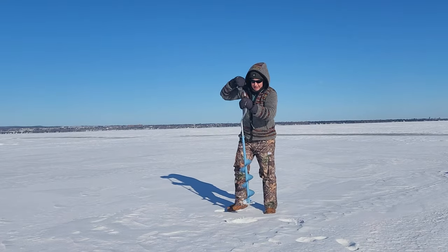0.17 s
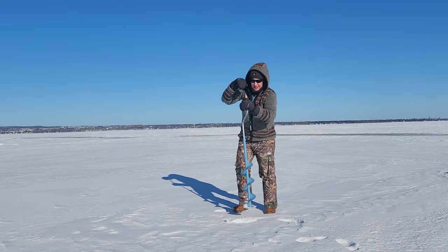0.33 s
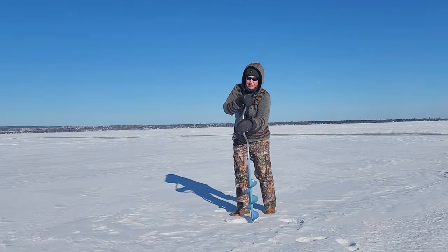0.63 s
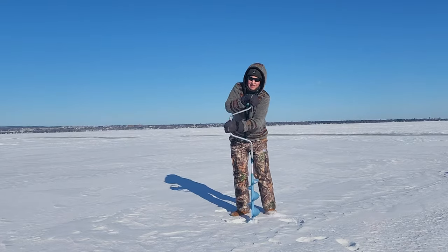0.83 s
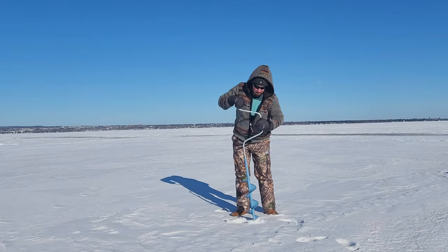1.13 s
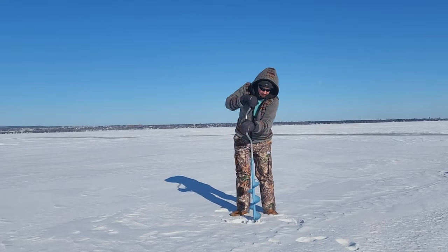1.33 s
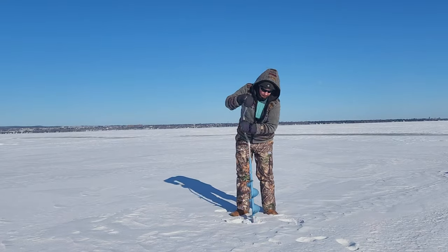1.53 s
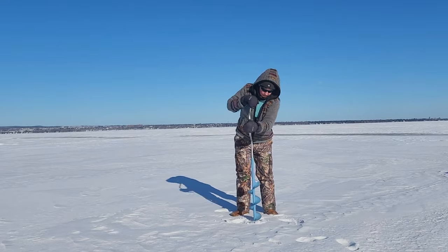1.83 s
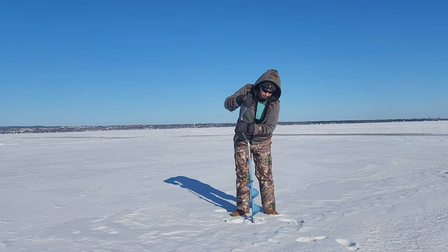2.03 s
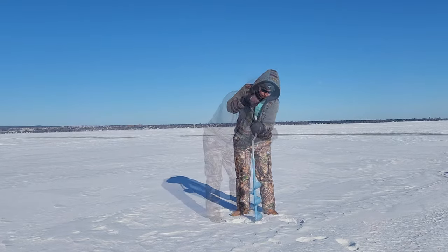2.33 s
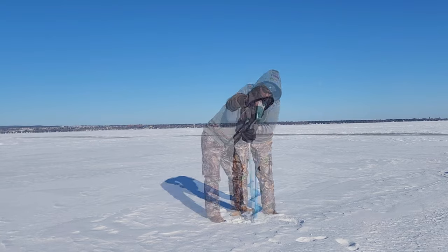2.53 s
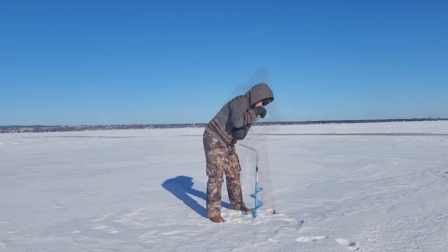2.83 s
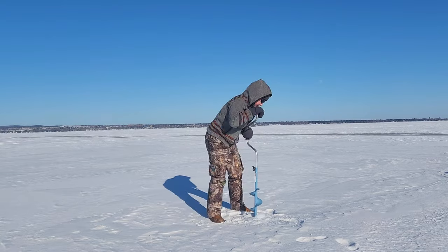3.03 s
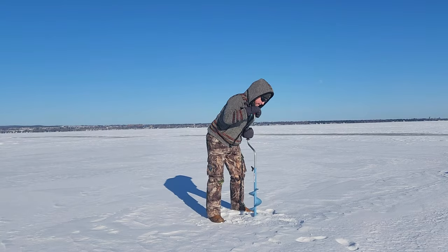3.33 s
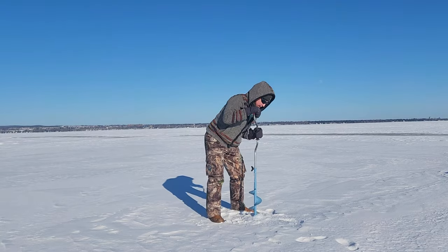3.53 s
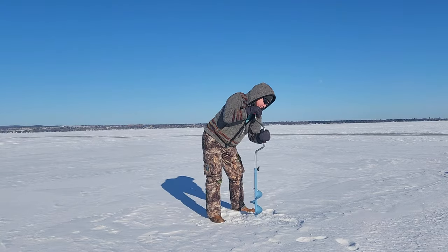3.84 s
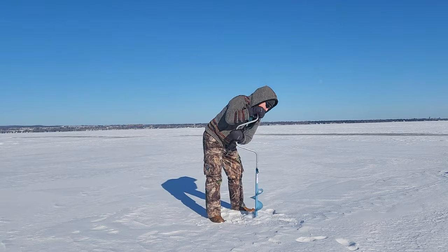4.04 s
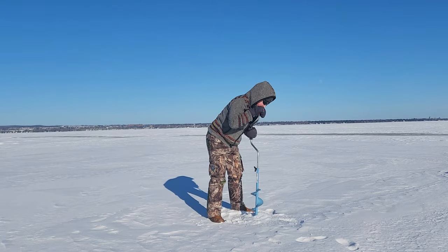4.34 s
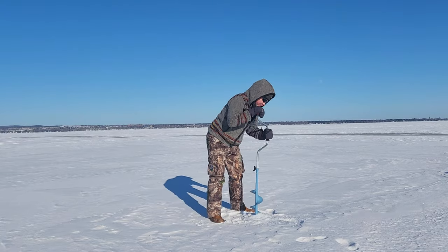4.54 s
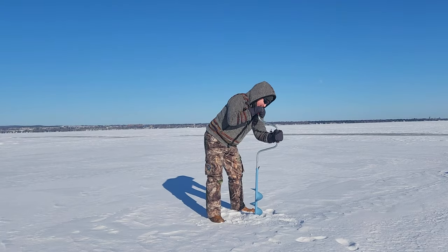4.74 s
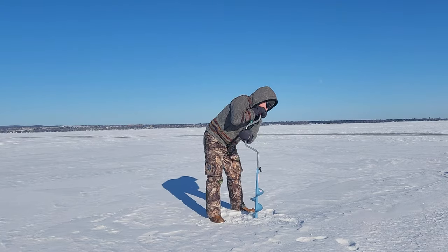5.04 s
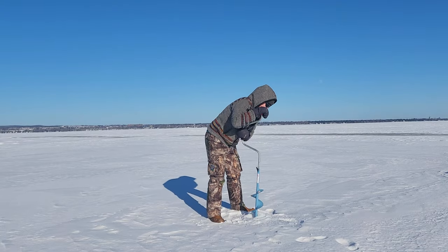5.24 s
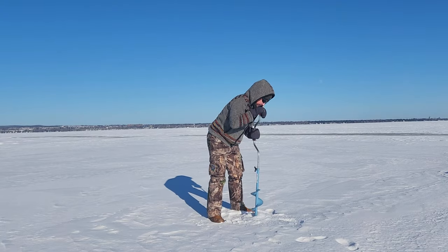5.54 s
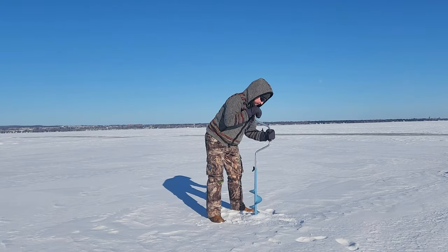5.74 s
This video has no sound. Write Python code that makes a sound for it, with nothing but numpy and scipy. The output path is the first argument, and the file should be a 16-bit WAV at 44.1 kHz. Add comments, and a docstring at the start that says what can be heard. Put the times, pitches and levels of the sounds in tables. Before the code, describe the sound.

A hand-cranked auger rasps and squeaks through packed snow, then grinds harder and hollower into ice, with wind rumbling on the microphone.

```python
"""Hand auger cutting snow, then ice

A hand-cranked auger shaves packed snow, then river ice, a few metres from a small camera.
Random noise stands for the tiny breaks; filters turn it into chips, blade grind, squeaks, steel and hole drum.
Bites are short noise bursts. Wind is lumpy filtered noise plus low swinging thumps on two microphone ports."""
import sys
import numpy as np
from scipy import signal
from scipy.fft import rfft, irfft, next_fast_len
from scipy.io import wavfile
from scipy.ndimage import uniform_filter1d, map_coordinates

SR = 44100
rng = np.random.default_rng(int(sys.argv[2]) if len(sys.argv) > 2 else 0)


def gain_from_db(level_db):
    """Convert decibel levels to linear amplitude factors (20 dB per decade)."""
    decades = np.asarray(level_db, float) / 20
    return 10 ** decades


def wav_record(signal):
    """Record a signal, one row per channel, as 16-bit PCM in the file named by sys.argv[1]."""
    frames = np.transpose(np.atleast_2d(signal))
    bounded = np.clip(frames, -1, 1)
    # unit amplitude maps onto the largest positive 16-bit level
    quanta = np.round(bounded * 32767).astype(np.int16)
    wavfile.write(sys.argv[1], SR, quanta)


N = 259308  # length in samples

# When snow gives way to ice: change_starts_s, change_ends_s
ICE_REACHED_S = 2.36, 2.42
# Balance of the parts at each moment: time_s, grind_over_shaving_db, drum_over_grind_db, low_blade_over_grind_db
# (cutting() lowers the grind a little in ice; the drum and blade functions add a fixed gain)
PART_LEVELS = [(0, -5, -8, 2), (.45, -6.5, -8, 0), (.84, -8.5, -8, -10), (1.08, -2, -8, -14),
               (1.4, -7.5, -8, -12), (1.55, -6.5, -8, 0), (2.06, -8.5, -8, 2.5), (2.45, -5, 0.5, -6),
               (2.66, -2, -3, -16), (2.78, -2.5, 5, -9), (2.9, -0.5, -6, -0.5), (3.55, -4.5, -1.5, 3.5),
               (3.8, -1.5, 2, -6.5), (4.1, -3.5, -5.5, -9), (4.27, 3, 1, 6), (4.46, -4.5, 2.5, 1),
               (4.72, -4, 0, 1), (4.9, -1.5, 0, -12), (5.22, -1.5, -7.5, -5), (5.5, -1.5, 7.5, 6.5),
               (5.65, -5, -5, 8), (5.88, 0.5, -3.5, -8)]


def cutting():
    """One stream of breaks excites the flying chips, the blades, the steel and the air in the hole."""
    grind_db, drum_db, low_blade_db = curves(PART_LEVELS)
    in_ice = np.interp(np.arange(N) / SR, ICE_REACHED_S, [0, 1])
    pressure = effort()
    plain_breaks = fractures(spread_db=2.5, chatter_db=1.1, snaps_db=0, in_ice=in_ice)
    even = pressure * plain_breaks
    breaks = pressure * patchy(plain_breaks, broad_db=1.2, narrow_db=3.5)
    body = grind(breaks, in_ice) + blade_modes(even, low_blade_db, in_ice)
    body = body + squeak(even, in_ice) + gain_from_db(drum_db) * hole_drum(even, in_ice)
    ring = gain_from_db(-46.0) * signal.fftconvolve(breaks, steel(scatter_db=1.0))[:N]
    return chips(breaks, in_ice) + ring + gain_from_db(grind_db - 1.1 * in_ice) * body


# Effort on the crank, heard as shaving level: time_s, level_db
EFFORT = [(0, -58), (.15, -70.5), (.36, -63), (.44, -51), (.52, -59.5), (.74, -54.5), (1.02, -48.5),
          (1.24, -54.5), (1.47, -45), (1.7, -51.5), (1.92, -47.5), (2.2, -51.5), (2.3, -58), (2.44, -46.5),
          (2.66, -44), (2.78, -50.5), (2.96, -43), (3.45, -45.5), (3.92, -43.5), (4.05, -53), (4.4, -57.5),
          (4.64, -48), (4.84, -45), (5.21, -43.5), (5.36, -55.5), (5.46, -61.5), (5.6, -48), (5.88, -44)]
# Blades run through harder or softer grain: middle_s, change_db, half_length_s
SURGES = [(0.207, 7, 0.045), (0.43, 12, 0.0099), (0.58, 11.5, 0.008), (0.653, -9, 0.025),
          (0.886, -6, 0.054), (2.552, -11.5, 0.02), (2.812, 9, .005), (3.166, 18.5, 0.03),
          (3.417, 14, 0.017), (3.73, 3.5, 0.017), (3.865, -5, 0.015), (4.189, 7, 0.025),
          (4.477, 5.5, 0.035), (4.782, -8, 0.035), (4.973, -11, 0.011)]
# The crank stalls: blades_let_go_s, blades_catch_again_s, depth_db
STALLS = [(0.203, 0.349, 22), (0.532, 0.623, 15), (2.463, 2.533, 22), (2.773, 2.88, 28.5),
          (3.037, 3.438, 42), (4.2, 4.295, 4.5), (5.463, 5.532, 29)]
LET_GO_S, CATCH_S = 0.058, .006  # how long the shaving takes to die, and to return


def effort():
    """Slow effort, plus surges, minus stalls that die away and end in a quick catch."""
    t = np.arange(N) / SR
    level_db, = curves(EFFORT)
    for middle, change_db, half in SURGES:
        level_db = level_db + change_db * np.exp(-((t - middle) / half) ** 2)
    for let_go, catch, depth_db in STALLS:
        stalled = np.minimum((t - let_go) / LET_GO_S, (catch - t) / CATCH_S)
        level_db = level_db - depth_db * np.clip(stalled, 0, 1)
    return gain_from_db(level_db)


def fractures(spread_db, chatter_db, snaps_db, in_ice):
    """Tiny breaks of uneven size, clumped by blade chatter; ice adds sudden snaps that die in a few ms."""
    size = gain_from_db(spread_db * rng.standard_normal(N))
    chatter = gain_from_db(chatter_db * (wobble(30) + wobble(70) + wobble(180)))
    snaps = (rng.random(N) < 260 / SR) * rng.random(N) * in_ice  # about 260 a second
    snap_decay = np.exp(-np.arange(SR // 50) / SR / .0012)
    crackle = 1 + gain_from_db(snaps_db) * signal.fftconvolve(snaps, snap_decay)[:N]
    return unit(rng.standard_normal(N) * size * chatter * crackle)


def patchy(x, broad_db, narrow_db):
    """The colour drifts as the cutting edge meets new grain: broad patches and narrow rasps."""
    z = signal.stft(x, nperseg=1024)[2]
    broad = broad_db * patches(z.shape, bins=20, hops=8)
    narrow = narrow_db * patches(z.shape, bins=2, hops=7)
    return unit(signal.istft(z * gain_from_db(broad + narrow), nperseg=1024)[1][:N])


# Colour of the shaved chips: pitch_hz, level_db (per Hz)
CHIP_COLOUR = [(2200, -87), (2900, -19), (3430, -2), (4150, 1), (5000, 0), (6400, -4), (7700, 4), (8400, 0),
               (9800, -3.5), (12200, -12), (14500, -9.5), (15900, -5), (16300, -91)]


def chips(breaks, in_ice):
    """Breaks throw off chips, heard as bright hiss; powdery snow hisses brighter."""
    hiss = coloured(breaks, CHIP_COLOUR)
    return hiss + 0.34 * (1 - in_ice) * filtered(hiss, lambda hz: hz > 8800)


# Colour of the blades in snow: pitch_hz, level_db (per Hz)
SNOW_GRIND = [(560, -69), (950, -9.5), (1250, -7), (1650, -4.5), (2040, -1), (2300, -1), (2800, -9),
              (3700, -55)]
# Colour of the blades in ice: pitch_hz, level_db (per Hz)
ICE_GRIND = [(500, -18.5), (740, -13), (1000, -10.5), (1300, -4.5), (1700, -5.5), (2080, -5.5),
             (2900, -12.5), (3770, -22), (6380, -120)]


def grind(breaks, in_ice):
    """The breaks shake the blades with one colour in snow and another in ice."""
    return (1 - in_ice) * coloured(breaks, SNOW_GRIND) + in_ice * coloured(breaks, ICE_GRIND)


# The blades' low resonance: pitch_hz, width_hz, level_db
LOW_BLADE = [(1390, 104, 0)]
# The blades' higher resonances, used in ice: pitch_hz, width_hz, level_db
HIGH_BLADES = [(1690, 38, -8), (2050, 93, -10)]


def blade_modes(even, low_blade_db, in_ice):
    """The breaks make the blades resonate; in ice higher resonances join, swelling at random."""
    low = gain_from_db(low_blade_db) * resonant(even, LOW_BLADE)
    high = in_ice * gain_from_db(3.8 * wobble(5)) * resonant(even, HIGH_BLADES)
    return gain_from_db(13.0) * (low + high)


# Packed snow squeaks under the blades: time_s, pitch_hz, level_db (against the grind)
SQUEAKS = [(.9, 1950, -1), (.97, 2030, 13), (1.14, 1960, 19), (1.26, 2080, 8), (1.32, 1790, 18),
           (1.39, 2050, 22), (1.51, 1780, 6), (1.59, 1970, 18.5), (1.8, 2100, 14), (1.92, 2030, 17),
           (1.99, 1670, 7), (2.15, 2200, 11)]


def squeak(even, in_ice):
    """Packed snow squeaks: the breaks pass through one narrow resonance whose pitch glides."""
    pitch_hz, level_db = curves(SQUEAKS)
    return (1 - in_ice) * gain_from_db(level_db) * gliding(even, pitch_hz, width_hz=98)


# Resonances of the air column in the hole: pitch_hz, width_hz, level_db
HOLE_AIR = [(650.4, 50.4, 4), (899, 46, -5)]
# How far the drum has moved to its lower pitch: time_s, share (0 to 1)
SAGGING = [(3.1, 0), (3.4, 1), (4.77, 1), (4.9, .4), (5.5, 1)]
HOLE_SAG = .935  # lower pitch as a ratio


def hole_drum(even, in_ice):
    """Breaks in ice drum the air in the hole; fading to a lower copy makes the pitch sag."""
    sag, = curves(SAGGING)
    usual = np.sqrt(1 - sag) * resonant(even, HOLE_AIR)
    lower = np.sqrt(sag) * resonant(even, HOLE_AIR, HOLE_SAG)
    return gain_from_db(15.5) * in_ice * (usual + lower)


# Ringing modes of the auger's flight: pitch_hz, level_db, time_to_fall_60_db_s
STEEL_MODES = [(1280, -8, .03), (1850, -12, .055), (4650, -5, .015), (7190, -9, .08), (7900, -6, .015),
               (9200, -12, .015)]


def steel(scatter_db, tilt_db=0):
    """The flight's modes after one tap; a dull tap tilts them down, in dB an octave."""
    t = np.arange(SR // 5) / SR
    lowest_hz = STEEL_MODES[0][0]
    ring = np.zeros(len(t))
    for hz, db, t60 in STEEL_MODES:
        start_db = db + tilt_db * np.log2(hz / lowest_hz) + scatter_db * rng.normal()
        ring += gain_from_db(start_db - 60 * t / t60) * np.sin(2 * np.pi * hz * t)
    return ring


# Blades biting: start_s, level_db (before a small fixed gain), grind_over_chips_db
BITES = [(0.419, -38.5, -12), (0.45, -31, -5), (2.4127, -32.5, -11.5), (2.5345, -39, 1), (2.627, -39, -1),
         (2.667, -38.5, 3.5), (2.782, -40.5, -3), (2.8814, -28, -2), (2.955, -32.5, 0.5), (2.9865, -33, -6),
         (3.021, -36, 4.5), (3.439, -27, -1), (3.4461, -19.5, -3.5), (3.5657, -27, -6), (3.608, -37.5, -6),
         (3.826, -38, -3.5), (3.906, -32, -1.5), (4.31, -47, 3.5), (4.342, -48.5, 6), (4.379, -51, 4.5),
         (4.828, -33.5, -11), (4.9778, -25.5, -3.5), (5.533, -45, 1)]
# The steel is tapped: start_s, level_db (before a fixed cut), tilt_db_per_octave
CLINKS = [(0.3498, -45, 2), (0.4328, -21.5, -8.5), (0.4495, -28, 2)]
# A bite this hard dies by 60 dB in this time; weaker ones crumble longer
SHARP_BITE_DB, SHARP_BITE_S, SOFTER_S_PER_DB = -19, .016, 0.0006


def bites():
    """Each bite is a short crunch of coarse breaks; a few clean taps ring the steel."""
    high, low, ring = np.zeros((3, N + SR))
    t = np.arange(SR // 5) / SR
    for s, db, grind_db in BITES:
        t60 = SHARP_BITE_S + SOFTER_S_PER_DB * max(SHARP_BITE_DB - db, 0)
        start = round(s * SR)
        crunch = rng.standard_normal(len(t)) * gain_from_db(rng.standard_normal(len(t)))  # uneven breaks
        crunch *= (1 - np.exp(-t / .0006)) * gain_from_db(db + .8 - 60 * t / t60)
        high[start:][:len(t)] += crunch
        low[start:][:len(t)] += gain_from_db(grind_db) * crunch
    for s, db, tilt_db in CLINKS:
        ring[round(s * SR):][:len(t)] += gain_from_db(db - 6.0) * steel(scatter_db=4.0, tilt_db=tilt_db)
    return coloured(high[:N], CHIP_COLOUR) + coloured(low[:N], ICE_GRIND) + ring[:N]


# How far the left port leads the right: pitch_hz, lead_radians
PORT_LEAD = [(300, -1), (2840, 0.39), (3270, -1.1), (4650, -1.05), (6550, -1.5), (9730, -1.37), (12500, -2),
             (16000, -3)]
# How much louder the left port is than the right: pitch_hz, left_over_right_db
PORT_BALANCE = [(500, -.5), (1400, -2.3), (2700, .5), (4200, -2), (6400, -4), (9000, 2), (15000, .5)]
# How far the phase wanders at each port: pitch_hz, wander_radians
PHASE_WANDER = [(800, .16), (2500, .3), (4000, .48), (14000, .65)]


def ports(x):
    """The camera body shades and delays the sound at each port; moving air makes each phase wander."""
    def half(hz):  # each port takes half the difference
        return gain_from_db(along(PORT_BALANCE, hz) / 2) * np.exp(.5j * along(PORT_LEAD, hz))

    pair = filtered(x, lambda hz: np.array([half(hz), 1 / half(hz)]))
    hz, _, z = signal.stft(pair, SR, nperseg=256)
    wander = along(PHASE_WANDER, hz)[:, None] * patches(z.shape, bins=3, hops=4)
    return signal.istft(z * np.exp(1j * wander), SR, nperseg=256)[1][:, :N]


# Wind across the ports, heard as flutter level: time_s, level_db
WIND = [(0, -40), (.4, -40.5), (1.4, -39), (1.65, -43), (2.1, -39), (2.75, -44), (3.15, -49.5), (3.7, -47),
        (4.2, -43), (4.55, -53), (5.0, -45), (5.38, -48), (5.53, -38.5), (5.88, -50)]
# Colour of the slow buffeting: pitch_hz, level_db (per Hz)
BUFFET = [(12, -38), (20, -22), (38, -4), (59, -3.5), (95, -2), (130, -19), (170, -69), (290, -120)]
# Colour of the quicker flutter: pitch_hz, level_db (per Hz)
FLUTTER = [(40, -92), (80, -21.5), (110, 8), (150, 8.5), (240, 0.5), (330, -50), (600, -120)]
# Colour of the rustle: pitch_hz, level_db (per Hz)
RUSTLE = [(180, -39), (270, 0.5), (450, -12.5), (650, -18), (900, -27.5), (2200, -34.5), (4000, -120)]
# Levels when the flutter is at CALM_DB, and dB gained for each dB of flutter above it
CALM_DB, BUFFET_DB, BUFFET_GROWS, RUSTLE_DB, RUSTLE_GROWS = -44.5, -39, 0.22, -59.5, 1.66


def wind():
    """Slow buffeting is largely shared; the quicker flutter and rustle belong more to each port."""
    flutter_db, = curves(WIND)
    buffet_db = BUFFET_DB + BUFFET_GROWS * (flutter_db - CALM_DB)
    rustle_db = RUSTLE_DB + RUSTLE_GROWS * (flutter_db - CALM_DB)
    buffet = gain_from_db(buffet_db) * gusts(BUFFET, alike=0.78, rate=12, lumps_db=3)
    flutter = gain_from_db(flutter_db) * gusts(FLUTTER, alike=0.39, rate=12, lumps_db=4)
    rustle = gain_from_db(rustle_db) * gusts(RUSTLE, alike=0.28, rate=12, lumps_db=5)
    return buffet + flutter + rustle + thumps()


def gusts(spectrum, alike, rate, lumps_db):
    """Lumpy pressure on both ports, a share of it (alike, 0 to 1) common to the two."""
    common, left, right = [gain_from_db(lumps_db * wobble(rate)) * rng.standard_normal(N) for _ in range(3)]
    pair = np.sqrt(alike) * common + np.sqrt(1 - alike) * np.array([left, right])
    return unit(coloured(pair, spectrum))


# Large eddies thumping the ports: middle_s, level_db (before a random lean to one port), pitch_hz
THUMPS = [(.09, -28, 50), (.227, -28.5, 63.4), (.32, -28, 79), (.445, -22, 144.5), (.652, -29, 60.5),
          (.788, -27, 151), (.871, -33, 140), (1.088, -34, 308), (1.387, -23, 57.5), (1.505, -30.5, 138),
          (1.621, -29, 141), (1.771, -28, 55), (1.841, -27.5, 184), (1.859, -29, 52.3), (2.093, -27.5, 84),
          (2.095, -30, 170), (2.246, -25.5, 95.5), (2.916, -25.5, 50.4), (3.242, -27.5, 75.5),
          (3.367, -27, 60), (3.483, -25, 56), (3.623, -28, 61.6), (3.709, -30, 68), (3.963, -26, 67),
          (4.15, -30, 74), (5.525, -29.5, 113), (5.57, -29, 84), (5.863, -30.5, 75)]
THUMP_S, THUMP_TURNS = 0.012, 0.49  # half length is this time plus this many cycles
SKEW_RAD_PER_HZ = 0.00574  # typical phase shift of each port, in opposite directions


def thumps():
    """Each eddy swings the pressure a few times, a little out of step between the ports."""
    t = np.arange(N) / SR
    side = np.array([[1], [-1]])
    out = np.zeros((2, N))
    for (s, db, hz), (start, skew, lean_db) in zip(THUMPS, rng.standard_normal((len(THUMPS), 3))):
        near = slice(max(round((s - .15) * SR), 0), round((s + .15) * SR))
        u = t[near] - s
        swing = np.sin(2 * np.pi * (hz * u + start) + side * skew * SKEW_RAD_PER_HZ * hz)
        swell = np.exp(-(u / (THUMP_S + THUMP_TURNS / hz)) ** 2)
        out[:, near] += gain_from_db(db + side * lean_db) * swell * swing
    return out


# Eddies striking a port: middle_s, level_db, left_over_right_db
PUFFS = [(0.314, -42, 2.5), (0.589, -36, 6), (0.745, -43, 3), (0.875, -45, 1.5), (1.089, -42, -6),
         (1.39, -42, -3), (1.75, -47, 0), (2.25, -44, 0), (5.516, -48.5, -7)]
# Colour of the puffs: pitch_hz, level_db (per Hz)
PUFF_COLOUR = [(120, -18), (250, 2.5), (500, -12), (1000, -24.5), (1500, -37), (3000, -120)]


def puffs():
    """Eddies make soft swells of rustle, most of them stronger on one port."""
    t = np.arange(N) / SR
    swell = np.zeros((2, N))
    for s, db, pan_db in PUFFS:
        swell += gain_from_db(db + np.array([[pan_db], [-pan_db]]) / 2) * np.exp(-((t - s) / 0.019) ** 2)
    return swell * gusts(PUFF_COLOUR, alike=0.19, rate=25, lumps_db=3.0)


def unit(x):
    """Scaled to rms 1."""
    return x / np.sqrt(np.mean(x ** 2) + 1e-20)


def along(points, hz):
    """(Hz, value) points read on a log axis."""
    f, v = np.transpose(points)
    return np.interp(np.log(hz + 1), np.log(f + 1), v)


def curves(rows):
    """One value per sample for each column after the time."""
    s, *cols = np.transpose(sorted(map(tuple, rows)))
    return [np.interp(np.arange(N) / SR, s, c) for c in cols]


def wobble(rate):
    """A smooth random curve, rate knots a second."""
    knots = rng.standard_normal(int(N * rate / SR) + 4)
    return map_coordinates(knots, [np.arange(N) * rate / SR])


def patches(shape, bins, hops):
    """A random field over frequency and time, smooth over some bins and hops."""
    across_pitch = uniform_filter1d(rng.standard_normal(shape), bins, axis=-2)
    return unit(uniform_filter1d(across_pitch, hops, axis=-1))


def filtered(x, response):
    """x with its spectrum multiplied by a response that depends on frequency."""
    m = next_fast_len(N + 8192)
    return irfft(rfft(x, m) * response(np.fft.rfftfreq(m, 1 / SR)), m)[..., :N]


def coloured(x, spectrum):
    """x through (Hz, dB) points, gain set so that white noise of rms 1 stays rms 1."""
    mean_power = np.mean(gain_from_db(along(spectrum, np.linspace(0, SR / 2, num=4096))) ** 2)
    return filtered(x, lambda hz: gain_from_db(along(spectrum, hz))) / np.sqrt(mean_power)


def resonant(x, modes, pitch_ratio=1):
    """x through (Hz, width Hz, dB) resonances, with nothing kept below 480 Hz."""
    def response(f):
        total = 0
        for centre, width, db in modes:
            total = total + gain_from_db(db) * 1j * f * width / ((centre * pitch_ratio) ** 2 - f * f + 1j * f * width)
        return total * (f > 480)

    return filtered(x, response)


def gliding(x, pitch_hz, width_hz):
    """x through one resonance whose centre moves: shift down to 0 Hz, smooth, shift back."""
    turn = np.exp(2j * np.pi * np.cumsum(pitch_hz) / SR)
    ring = np.pi * width_hz / SR * np.exp(-np.pi * width_hz * np.arange(SR // 20) / SR)
    return 2 * np.real(turn * signal.fftconvolve(x / turn, ring)[:N])


def scene():
    """Auger through the ports, wind on them."""
    return ports(cutting() + bites()) + wind() + puffs()


def band_limit(x):
    """A steep low-pass at the top of the band."""
    return signal.sosfilt(signal.butter(12, 16660, fs=SR, output="sos"), x)


def record(dry):
    """The camera keeps only the sound below its band limit."""
    mix = filtered(dry, lambda hz: hz < 15950)
    return band_limit(mix)


dry = scene()
out = record(dry)
wav_record(out)
```